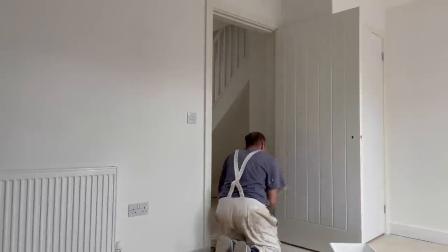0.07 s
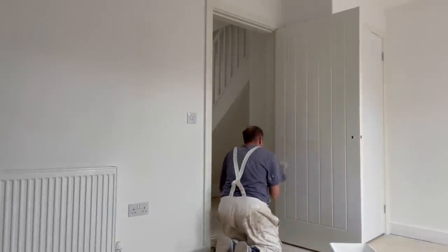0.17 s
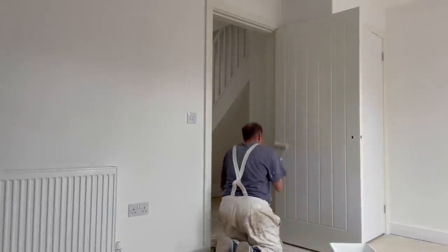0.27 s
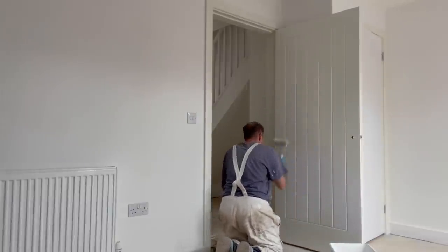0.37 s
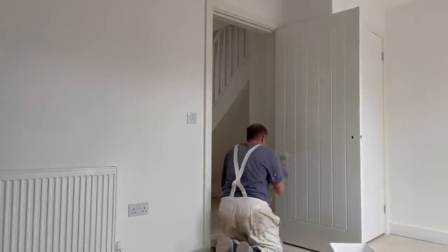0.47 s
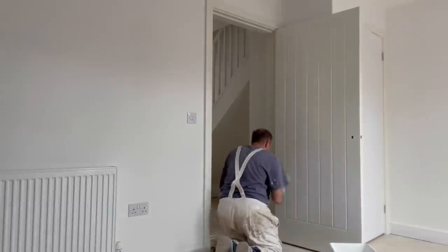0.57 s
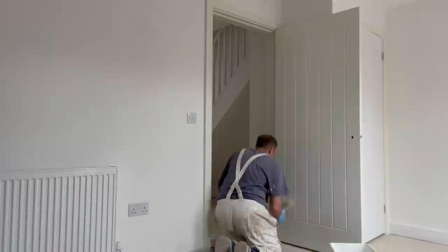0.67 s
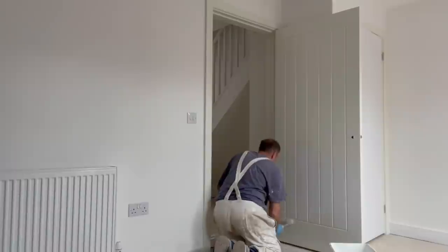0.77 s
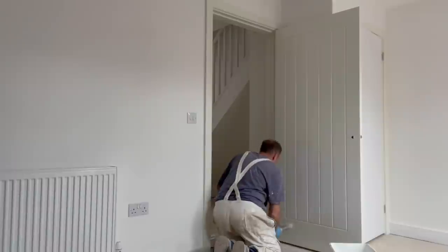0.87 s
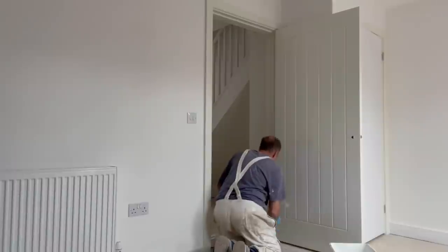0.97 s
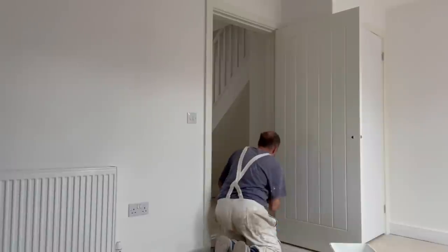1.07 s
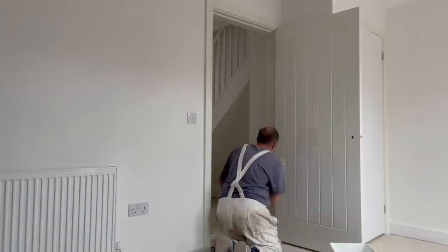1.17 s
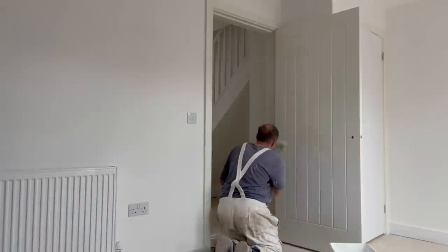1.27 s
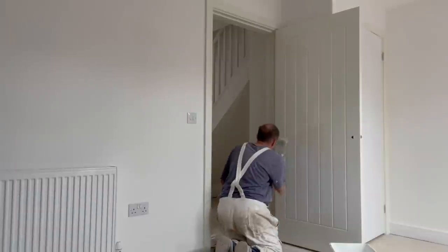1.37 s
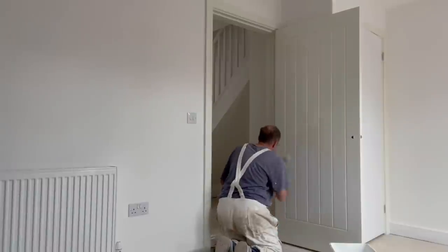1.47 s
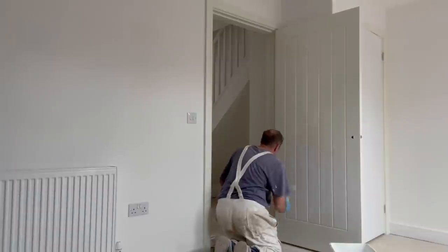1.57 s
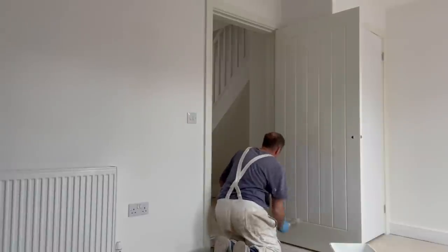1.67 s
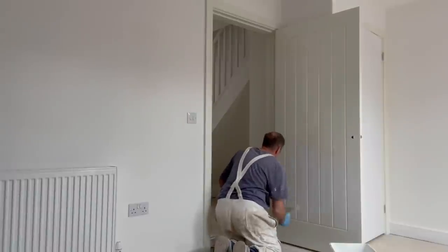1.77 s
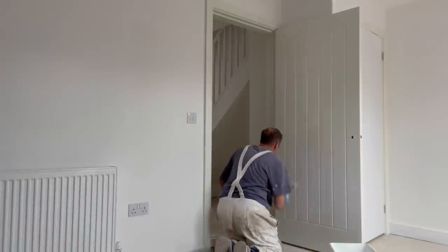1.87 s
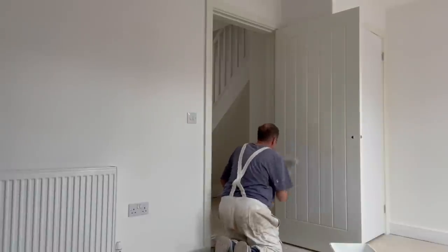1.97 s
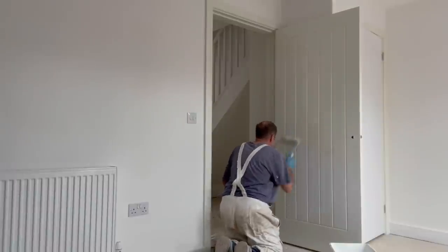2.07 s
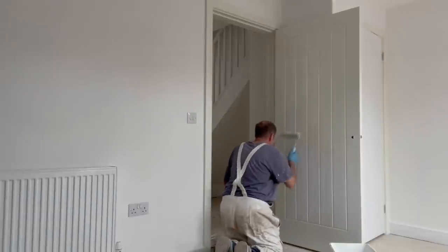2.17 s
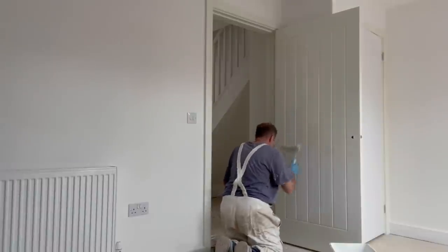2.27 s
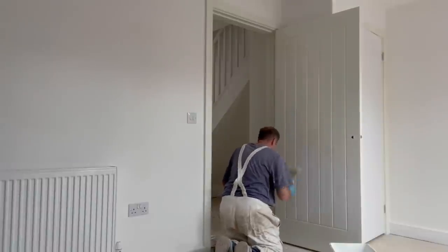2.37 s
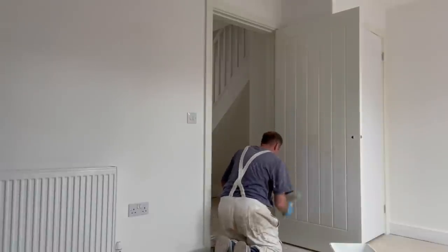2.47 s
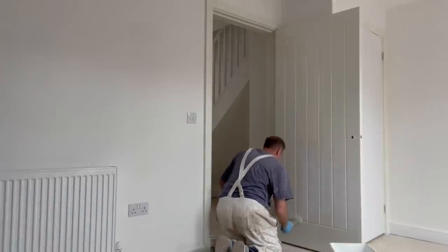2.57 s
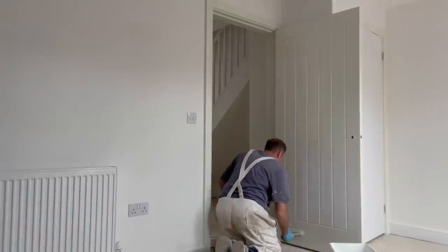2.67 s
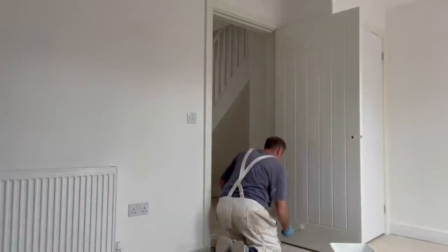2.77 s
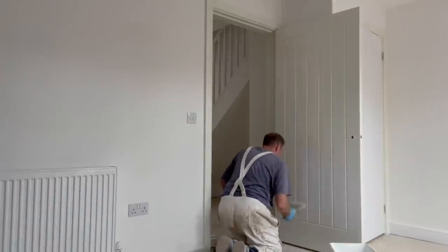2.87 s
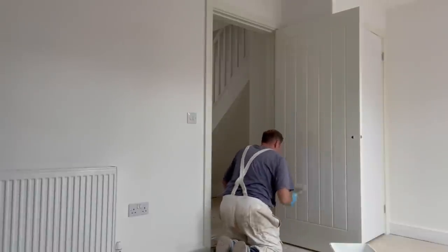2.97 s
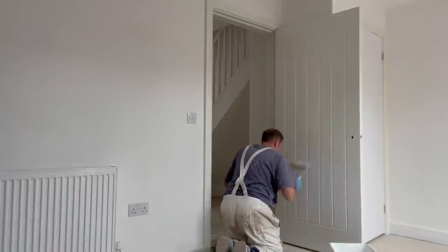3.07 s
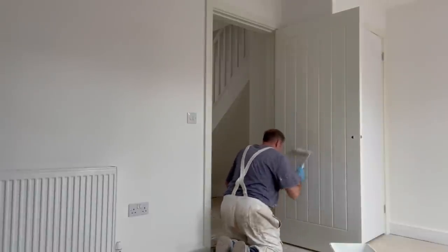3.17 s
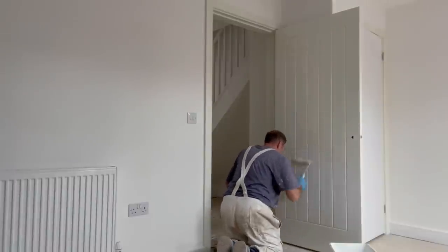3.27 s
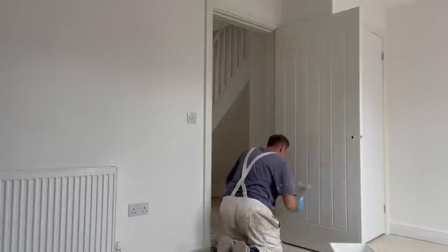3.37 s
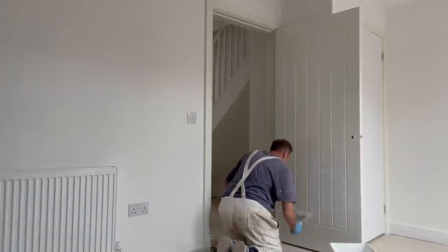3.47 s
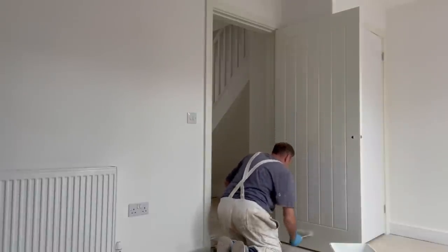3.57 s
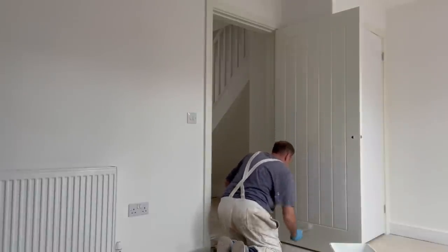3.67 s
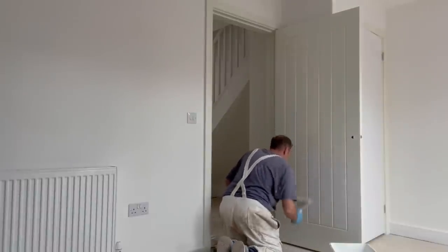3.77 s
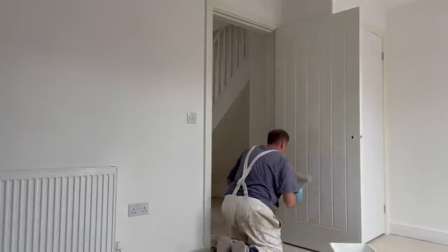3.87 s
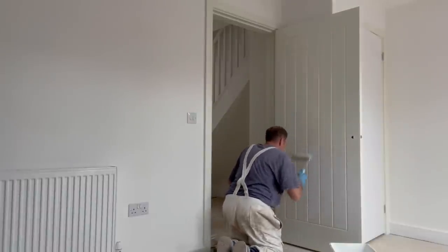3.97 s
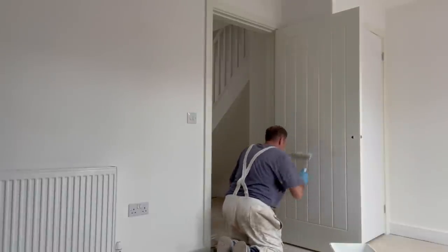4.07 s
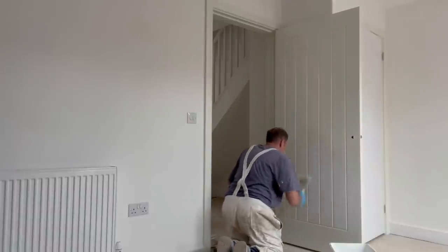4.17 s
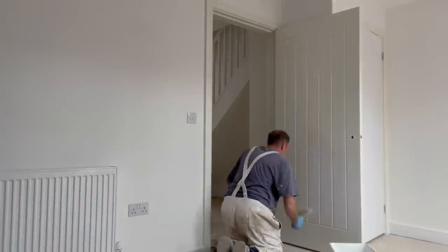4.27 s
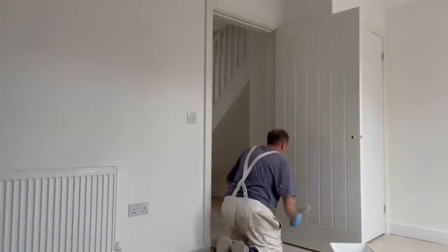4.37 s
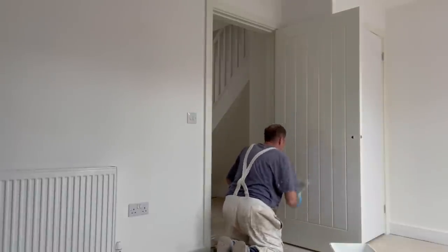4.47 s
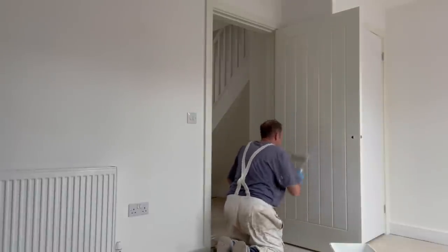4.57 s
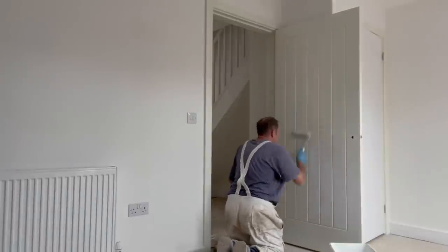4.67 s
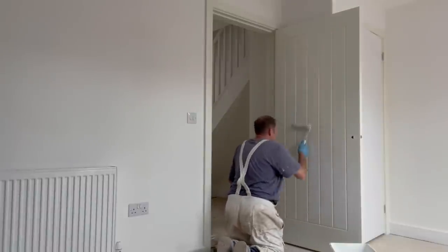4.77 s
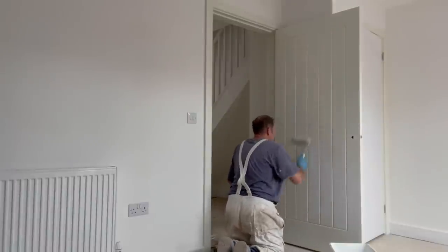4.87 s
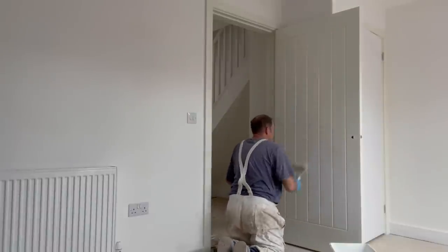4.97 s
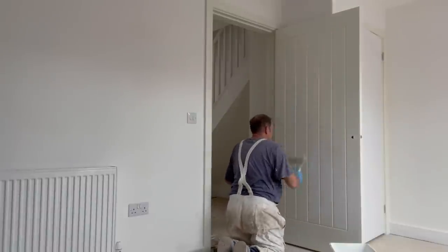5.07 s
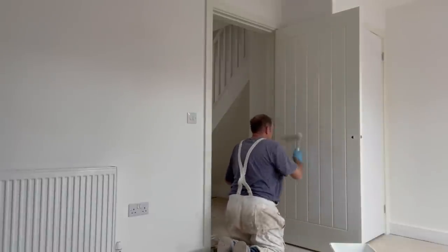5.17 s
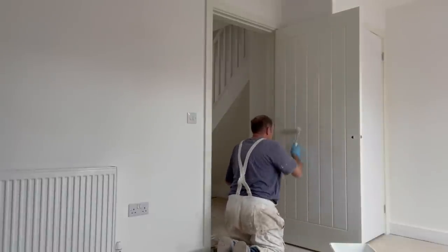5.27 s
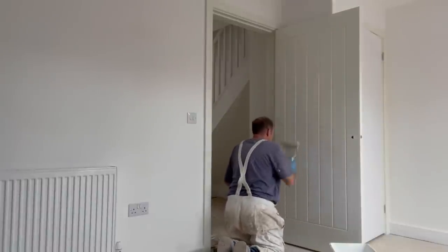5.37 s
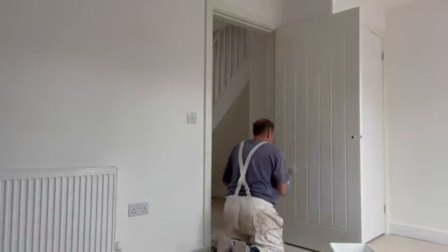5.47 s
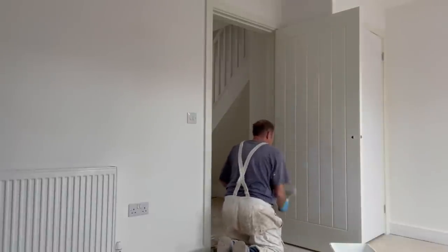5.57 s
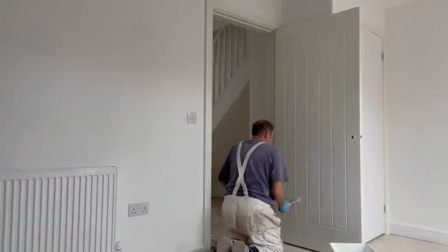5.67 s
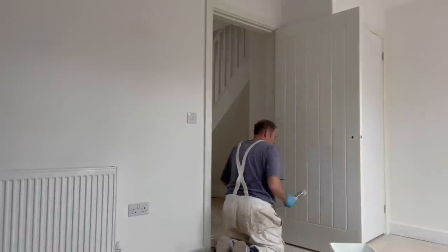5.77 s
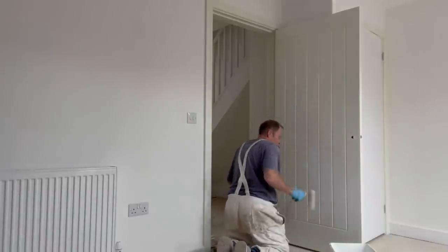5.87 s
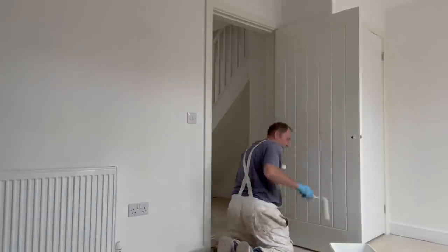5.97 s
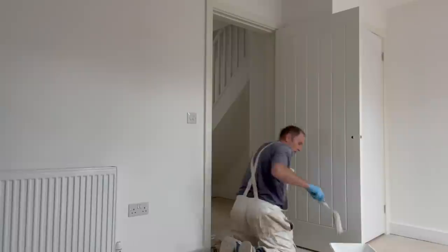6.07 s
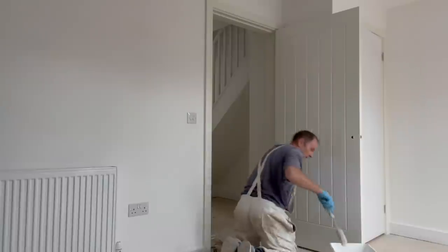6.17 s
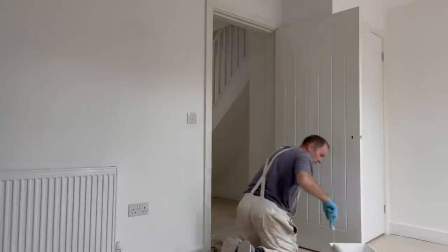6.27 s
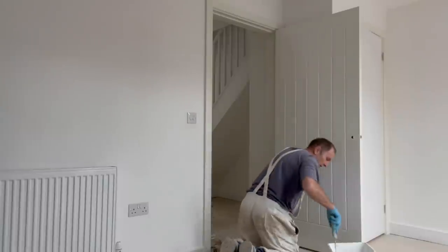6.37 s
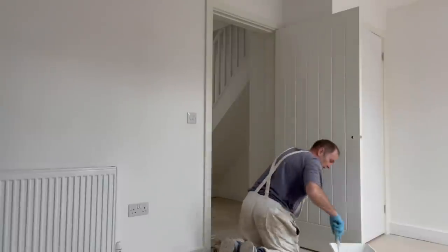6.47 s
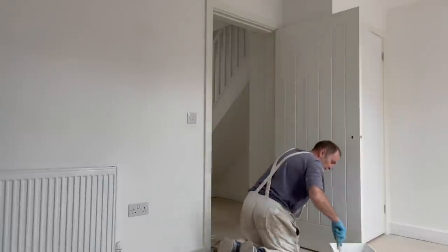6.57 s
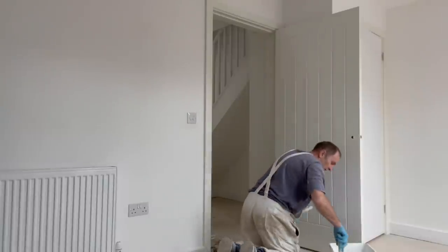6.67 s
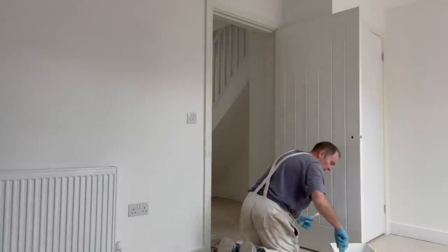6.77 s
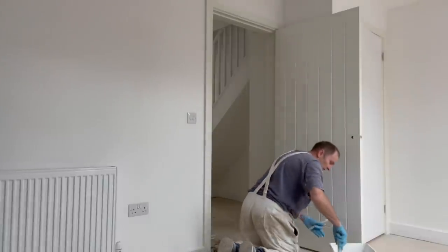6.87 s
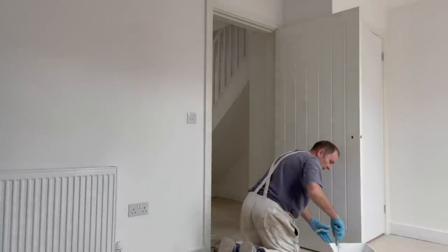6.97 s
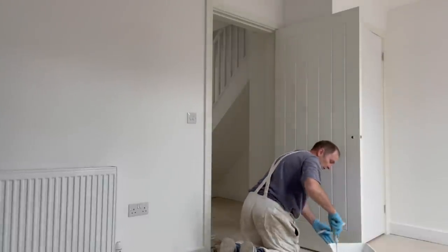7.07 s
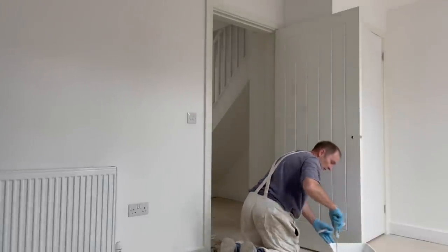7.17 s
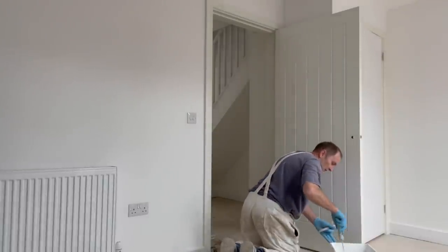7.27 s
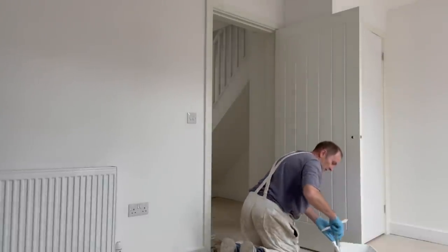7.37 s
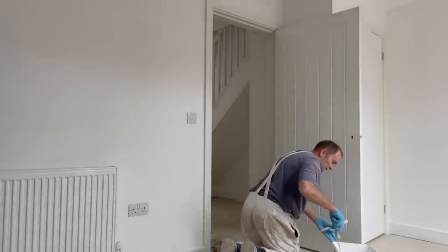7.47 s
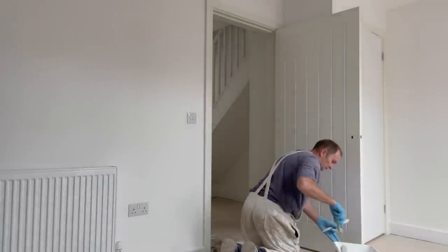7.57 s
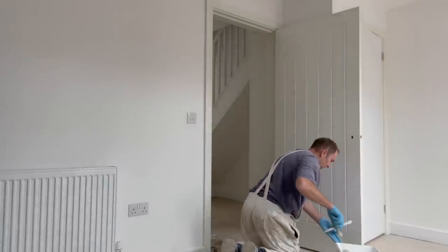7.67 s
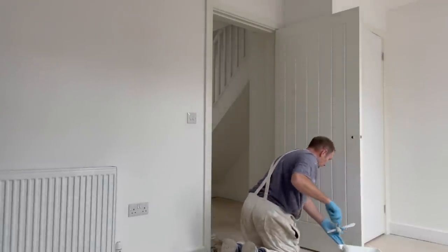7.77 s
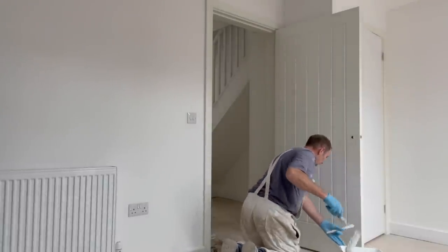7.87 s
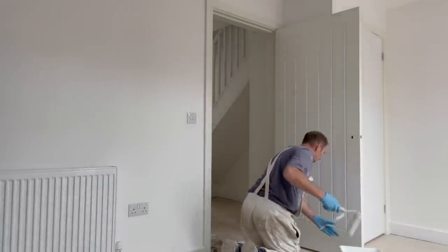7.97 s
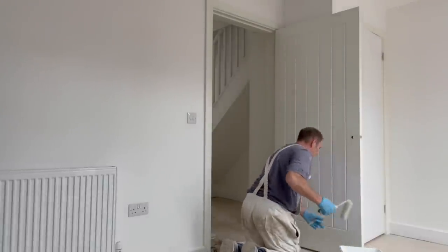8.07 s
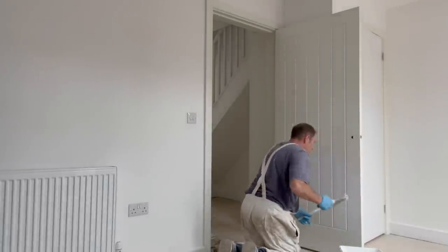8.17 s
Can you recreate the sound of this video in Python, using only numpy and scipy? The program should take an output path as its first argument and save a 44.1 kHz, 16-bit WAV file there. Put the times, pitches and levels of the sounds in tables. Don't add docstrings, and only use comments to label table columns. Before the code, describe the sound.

Indoors, a paint roller rumbles over a wooden door in quick strokes with dull knocks, then a tray is knocked and dragged across the floor.

```python
import sys
import numpy as np
from scipy import signal
from scipy.fft import rfft, irfft, next_fast_len
from scipy.io import wavfile
from scipy.ndimage import uniform_filter1d

SR = 44100
rng = np.random.default_rng(int(sys.argv[2]) if len(sys.argv) > 2 else 0)


def digitize_waveform(pressure):
    field = np.atleast_2d(pressure).T
    bounded = np.clip(field, -1, 1)
    quanta = np.round(bounded * 32767).astype(np.int16)
    wavfile.write(sys.argv[1], SR, quanta)


def invert_db(x):
    u = np.asarray(x, float) / 20
    return 10 ** u


N = 362943

PORT_LAG_S = 20 / SR


def unit(x):
    return x / np.sqrt(np.mean(x ** 2) + 1e-20)


def along(points, hz):
    f, value = np.transpose(points)
    return np.interp(np.log(hz + 1), np.log(f + 1), value)


def curves(rows):
    s, *columns = np.transpose(rows)
    return [np.interp(np.arange(N) / SR, s, column) for column in columns]


def wobble(rate):
    knots = rng.standard_normal(int(N * rate / SR) + 4)
    return np.interp(np.arange(N) * rate / SR, np.arange(len(knots)), knots)


def filtered(x, response):
    m = next_fast_len(N + 8192)
    return irfft(rfft(x, m) * response(np.fft.rfftfreq(m, 1 / SR)), m)[..., :N]


def modes(table):
    def response(f):
        total = 0
        for k, (centre, width, db) in enumerate(table):
            resonance = 1j * f * width / (centre * centre - f * f + 1j * f * width)
            total = total + (-1) ** k * invert_db(db) * resonance
        return total
    return response


def shape(spectrum):
    return lambda hz: invert_db(along(spectrum, hz))


# (frequency [Hz], likeness [0-1])
LIKENESS = [(60, 0.97), (200, 0.79), (350, 0.25), (550, 0.51), (900, 0.37), (1500, 0.016), (6000, 0.068)]


def ports(pair, response):
    m = next_fast_len(N + 8192)
    hz = np.fft.rfftfreq(m, 1 / SR)
    turn = np.arccos(np.clip(along(LIKENESS, hz), -1, 1)) / 2
    common, apart = rfft(pair, m) * response(hz) * [np.cos(turn), np.sin(turn)]
    left = (common + apart) * np.exp(-2j * np.pi * hz * PORT_LAG_S)
    right = common - apart
    return unit(irfft([left, right], m)[:, :N])


def diffuse(response, lumps_db, rate, spiky_db=0):
    noise = rng.standard_normal((2, N))
    force_db = lumps_db * wobble(rate) + spiky_db * rng.standard_normal(N)
    return ports(noise * invert_db(force_db), response)


def gliding(hz, width_hz):
    turn = 2 * np.pi * np.cumsum(hz) / SR
    pair = [wobble(width_hz) * np.cos(turn) + wobble(width_hz) * np.sin(turn) for _ in range(2)]
    return ports(np.array(pair), lambda f: 1)


def swells(rows, pointed, rest_db=-120, order=2):
    t = np.arange(0, N + 64, 64) / SR
    s, rise, hold, fall, db = np.transpose(rows)[:, :, None]
    before, after = (s - t) / abs(rise), (t - s - abs(hold)) / abs(fall)
    away = np.maximum(before, after).clip(0)
    power = (invert_db(db - 10 * away ** pointed) ** order).sum(0) + invert_db(rest_db) ** order + 1e-60
    return np.interp(np.arange(N) / SR, t, 20 / order * np.log10(power))


def thumps(rows, rise, gain_db, overtone):
    out, t = np.zeros(N + SR), np.arange(SR // 6) / SR
    for s, db, hz, t60 in rows:
        phase = rng.uniform(0, 2 * np.pi)
        ring = np.sin(2 * np.pi * hz * t) + overtone * np.sin(2 * np.pi * 1.75 * hz * t + phase)
        contact = 1 - np.exp(-(t / rise) ** 2)
        start = round((s - rise / 3) * SR)
        out[start:][:len(t)] += invert_db(db + gain_db - 60 * t / t60) * contact * ring
    return out[:N]


# (frequency [Hz], t60 [s])
WALLS = [(150, 0.39), (600, 0.73), (4000, 1), (12000, 0.079)]


def room(x, wet_db):
    hz, t, z = signal.stft(rng.standard_normal((2, SR // 2)), SR, nperseg=256)
    decay = invert_db(-60 * t / along(WALLS, hz)[:, None])
    tail = signal.istft(z * decay, SR, nperseg=256)[1]
    tail = tail / np.linalg.norm(tail[0])
    late = np.pad(x, (250, 0))[None]
    wet = signal.fftconvolve(late, tail, axes=1)[:, :N]
    direct = filtered(x, lambda hz: np.exp(-2j * np.pi * hz * [[PORT_LAG_S], [0]]))
    return direct + invert_db(wet_db) * wet


# (frequency [Hz], density [dB per Hz])
AIR = [(20, -40), (28, -19), (48, 4), (76, 0.5), (184, -8.5), (350, -4), (1000, -9), (1600, -12.5),
       (6000, -26.5), (16000, -59)]


def house_air():
    return invert_db(-53.5) * diffuse(shape(AIR), lumps_db=-2.0, rate=4.06)


# (full weight from [s], rise [s], hold [s], fall [s], boom [dB])
ARM_WEIGHT = [(.12, 0.18, 0.092, 0.13, -31.5), (.52, 0.073, 0.1, 0.054, -25.5),
              (.66, 0.033, 0.067, 0.087, -28), (.95, .06, 0.22, 0.19, -31),
              (1.5, 0.075, 0.11, 0.075, -21.5), (1.76, 0.18, 0.26, 0.11, -24.5),
              (2.33, 0.091, 0.14, .05, -23), (2.5, 0.066, 0.049, 0.11, -21),
              (2.82, 0.058, 0.041, 0.041, -28), (2.97, 0.066, 0.15, 0.073, -26.5),
              (3.34, 0.095, 0.17, 0.086, -21), (3.645, 0.014, 0.07, 0.045, -25.5),
              (3.76, 0.044, 0.16, 0.12, -25), (4.13, 0.055, 0.078, 0.11, -21.5),
              (4.42, 0.11, 0.18, 0.12, -24), (4.87, 0.075, 0.061, 0.093, -24.5),
              (5.05, 0.054, 0.039, 0.12, -24.5), (5.36, 0.056, 0.16, 0.096, -26.5)]
# (full speed from [s], rise [s], hold [s], fall [s], paint fizz [dB])
STROKES = [(.05, 0.36, 0.2, 0.1, -48), (.5, 0.17, 0.24, 0.14, -45), (.94, 0.049, 0.27, 0.12, -47),
           (1.5, 0.16, 0.077, 0.13, -43.5), (1.745, 0.048, 0.28, 0.16, -47.5),
           (2.33, 0.17, 0.18, 0.18, -44), (2.77, 0.032, 0.023, 0.21, -48), (2.97, 0.42, 0.065, 0.14, -51),
           (3.4, 0.21, 0.095, 0.11, -46.5), (3.73, 0.13, 0.18, 0.15, -46.5),
           (4.14, 0.11, 0.073, 0.13, -44.5), (4.37, 0.02, 0.18, 0.26, -45.5),
           (4.87, 0.088, 0.044, .13, -44), (5.07, 0.21, 0.025, 0.15, -46), (5.42, 0.13, 0.084, 0.1, -44)]
# (from [s], rise [s], hold [s], fall [s], level [dB])
SWINGS = [(.08, 0.13, 0.48, 0.19, -37.5), (.74, 0.03, 0.066, 0.037, -30.5), (1.1, 0.19, 0.16, 0.095, -37),
          (1.5, 0.27, 0.041, 0.12, -40), (1.76, 0.075, 0.21, 0.1, -31), (2.3, 0.18, 0.084, .1, -45),
          (2.56, 0.019, 0.014, 0.049, -28), (2.78, 0.06, 0.07, 0.44, -36.5),
          (3.48, 0.044, 0.016, 0.053, -23), (3.3, 0.092, 0.073, 0.09, -37),
          (3.68, 0.065, 0.041, 0.22, -30.5), (4.1, 0.081, 0.19, 0.094, -41.5),
          (4.42, 0.064, 0.12, 0.12, -33.5), (4.87, 0.061, 0.14, 0.13, -37), (5.35, 0.12, 0.18, 0.16, -44)]
# (time [s], ring [Hz])
PANEL_RING = [(0, 184.4), (.38, 178), (.7, 263.8), (.92, 245), (1.28, 182.8), (1.62, 273.1), (2.03, 185.5),
              (2.55, 262.8), (2.8, 280), (3.1, 226), (3.48, 269.8), (3.95, 190), (4.25, 269.4),
              (4.7, 224.9), (4.9, 250.6), (5.12, 222.6), (5.33, 225), (5.6, 262.5)]
# (frequency [Hz], width [Hz], level [dB])
DOOR_MODES = [(183, 15.5, 0), (252, 65.3, -2), (300, 48.7, -1), (360, 29, -8), (437.6, 10.1, -4),
              (524, 28, -12), (597, 62, -13.5), (960, 550, -28)]
# (frequency [Hz], width [Hz], level [dB])
HINGE_MODES = [(50, 7.2, -4.5), (75.4, 11.3, 2), (99, 25.7, 6), (143, 38, -2.5)]
# (frequency [Hz], density [dB per Hz])
FIZZ = [(2000, -3), (3500, -2), (5000, 0), (7000, 0), (10000, -1), (13000, -4), (16000, -6)]
# (frequency [Hz], density [dB per Hz])
RUB = [(410, 4), (700, 2.5), (798, 2), (1040, -2.5), (1470, -20.5), (2210, -8), (5000, -16.5), (6500, -46),
       (11000, -120)]


def roller():
    lift_s = 5.62
    on_door = np.clip((lift_s - np.arange(N) / SR) / 0.094 + 1, 1e-4, 1)
    boom_db = swells(ARM_WEIGHT, pointed=1.33, rest_db=-57, order=4)
    fizz_db = swells(STROKES, pointed=1.29, rest_db=-55.5, order=8)
    rub_db = -48.5 + 0.56 * (fizz_db + 47) + 0.37 * (boom_db + 27.0)
    panel_hz, = curves(PANEL_RING)
    boom = invert_db(boom_db - 5.0) * diffuse(modes(DOOR_MODES), lumps_db=0.6, rate=51)
    panel = invert_db(boom_db - 8.5) * gliding(panel_hz, width_hz=54)
    sway = invert_db(swells(SWINGS, pointed=0.97)) * diffuse(modes(HINGE_MODES), lumps_db=0.0, rate=31)
    fizz = invert_db(fizz_db + 6.0) * diffuse(shape(FIZZ), lumps_db=-0.33, rate=14, spiky_db=2.5)
    sheen_gain = invert_db(0.27 * (fizz_db + 45.5)) - 1
    fizz = fizz + sheen_gain * filtered(fizz, lambda hz: hz > 10900)
    rub = invert_db(rub_db + 7) * diffuse(shape(RUB), lumps_db=0.6, rate=36, spiky_db=-1.0)
    return on_door * (boom + panel + sway + fizz + rub)


# (from [s], hold [s], level [dB], ring [Hz], split into two bands [Hz])
SHUFFLE = [
    (0.01, 0.065, -51, 2050, 460),
    (1.57, 0.12, -53, 1659, 25),
    (5.71, 0.18, -48, 1230, 200),
    (5.944, 0.06, -46, 859, 219.7),
    (6.14, 0.068, -51.5, 1860, 439),
]


def cloth():
    rise_s, fall_s, sag_hz_per_s = 0.032, 0.16, 350
    s, hold, db, ring, split = np.transpose(SHUFFLE)
    level_db = swells([(a, rise_s, h, fall_s, d) for a, h, d in zip(s, hold, db)], pointed=1.3)
    t = np.arange(N) / SR
    slide = np.searchsorted(s[1:] - rise_s, t)
    ring_hz = (ring[slide] - sag_hz_per_s * (t - s[slide])).clip(400)
    two_bands = np.cos(2 * np.pi * np.cumsum(split[slide]) / SR)
    return invert_db(level_db + 6.5) * gliding(ring_hz, width_hz=400) * two_bands


# (from [s], rise [s], hold [s], fall [s], level [dB])
DRAGS = [
    (0.01, 0.03, 0.041, 0.16, -46.5),
    (5.77, 0.086, 0.056, 0.28, -43.5),
    (6.18, 0.04, 0.046, 0.039, -44.5),
    (6.235, 0.017, 0.045, 0.14, -42),
    (6.375, .006, 0.033, 0.13, -46.5),
    (6.54, 0.052, 0.014, 0.14, -44),
    (7.04, 0.045, 0.019, 0.1, -54),
    (7.285, 0.01, 0.084, 0.11, -50.5),
    (7.9, 0.21, 0.063, 0.17, -41),
]
# (from [s], rise [s], hold [s], fall [s], level [dB])
HOLLOW_SWELLS = [(5.6, 0.074, 0.011, 0.087, -40), (5.79, 0.05, 0.029, 0.134, -45),
                 (5.97, 0.059, 0.054, 0.057, -50), (6.24, 0.01, 0.032, 0.043, -31.5),
                 (6.36, .05, 0.039, 0.13, -45.5), (6.54, 0.061, 0.071, 0.15, -46.5),
                 (7.04, 0.026, .02, 0.11, -55), (7.295, 0.011, 0.053, 0.068, -37),
                 (7.42, 0.064, 0.12, .1, -43), (7.56, 0.023, 0.023, 0.043, -34),
                 (7.64, 0.04, 0.085, 0.036, -27), (7.78, 0.017, 0.038, 0.029, -31),
                 (7.9, .1, 0.17, 0.095, -43.5)]
# (from [s], rise [s], hold [s], fall [s], level [dB])
DIPS = [(5.77, 0.23, 0.011, 0.13, -55.5), (6.01, 0.067, .03, .09, -55.5), (6.23, 0.0085, .01, 0.16, -48),
        (6.372, .008, 0.034, 0.099, -62), (6.53, 0.038, 0.029, 0.065, -49),
        (6.595, 0.033, 0.017, 0.072, -46.5), (6.8, .08, 0.27, 0.074, -64), (7.0, 0.018, 0.11, 0.079, -56.5),
        (7.284, 0.0009, 0.072, 0.15, -48), (7.67, 0.064, 0.12, 0.078, -44.5),
        (7.92, .1, 0.12, 0.049, -60.5)]
# (from [s], rise [s], hold [s], fall [s], level [dB])
THUDS = [
    (5.74, 0.057, 0.043, 0.022, -50.5),
    (7.37, .03, 0.042, .06, -41),
    (6.0, 0.057, 0.017, 0.057, -45),
    (6.25, 0.022, 0.036, 0.1, -33.5),
    (6.6, 0.023, 0.0092, 0.041, -47.5),
    (7.0, .03, 0.026, 0.15, -55.5),
    (7.31, 0.0069, 0.036, 0.076, -32),
    (7.6, 0.12, 0.16, 0.14, -36),
    (7.95, 0.08, 0.1, 0.12, -52.5),
]
# (frequency [Hz], width [Hz], level [dB])
HOLLOW_MODES = [(218, 46, -2), (280, 102, 1.5), (368, 49, 5), (430, 46, -7.5), (560, 210, -6.5)]
# (frequency [Hz], density [dB per Hz])
SLOSH = [(2000, -8), (3500, -1.5), (5000, -1), (7000, -3), (10000, -4), (13000, -10), (16000, -14)]
# (frequency [Hz], density [dB per Hz])
SCRAPE = [(260, -38), (450, 0.5), (579, -1), (638, 2.5), (842, 1), (905, 4.5), (1010, 1.5), (1380, -1),
          (2180, -5.5), (2520, -6), (5310, -17.5), (8000, -25), (10400, -49), (17600, -120)]


def tray():
    floor_modes = [(71.4, 54, -1.5), (155, 64, 2)]  # (Hz, width Hz, dB)
    hollow_db = swells(HOLLOW_SWELLS, pointed=0.87)
    hollow = invert_db(hollow_db + 3.0) * diffuse(modes(HOLLOW_MODES), lumps_db=3.5, rate=35)
    thud_db = swells(THUDS, pointed=0.99)
    thud = invert_db(thud_db + 0.3) * diffuse(modes(floor_modes), lumps_db=0.0, rate=9.6)
    dip_db = swells(DIPS, pointed=0.8)
    fizz = invert_db(dip_db + 5.5) * diffuse(shape(SLOSH), lumps_db=1.5, rate=38, spiky_db=4.0)
    drag_db = swells(DRAGS, pointed=1.35)
    scrape = invert_db(drag_db + 4.0) * diffuse(shape(SCRAPE), lumps_db=-0.15, rate=74, spiky_db=1.0)
    return hollow + thud + fizz + scrape


# (time [s], peak [dB], ring [Hz], t60 [s])
TAPS = [(.012, -36, 602, 0.18), (.05, -38, 570, .15), (.15, -25, 190, .08), (.212, -27, 158, .15),
        (1.075, -26.5, 135, 0.21), (1.485, -25, 564, .06), (1.578, -23, 554, 0.073),
        (2.758, -15, 502, 0.063), (2.776, -12, 430, 0.078), (2.786, -16, 380, 0.059),
        (2.811, -25, 529.6, 0.065), (2.829, -22, 565, 0.055), (2.85, -28, 580, .06),
        (2.868, -24, 473, 0.048), (2.884, -30, 600, .04), (2.915, -34, 510.4, 0.064),
        (3.338, -22, 560, 0.046), (3.459, -12.5, 494, 0.051), (3.474, -19, 635, 0.074),
        (3.488, -18, 418, 0.051), (3.524, -32, 490, 0.05), (5.61, -29.5, 278.6, 0.13),
        (5.779, -36, 357, .1), (5.884, -37, 415, 0.1), (5.945, -31, 750, .06), (5.985, -36, 109, .1),
        (6.033, -33, 730, .07), (6.16, -40, 643, 0.23), (6.296, -26, 170, 0.12), (6.325, -33, 200, 0.068),
        (6.35, -34, 322, 0.1)]


def taps():
    return thumps(TAPS, rise=0.0059, gain_db=2.0, overtone=0)


# (time [s], peak [dB], ring [Hz])
NUDGES = [(0.103, -27, 185), (0.263, -30, 170), (0.442, -31, 220), (0.534, -18.5, 280), (0.669, -26, 314),
          (0.778, -42, 282), (0.924, -28.5, 256), (1.056, -26, 259), (1.119, -28, 316), (1.426, -28, 248),
          (1.785, -33, 250), (1.924, -16.5, 251), (2.014, -21.5, 183), (2.292, -29, 208), (2.327, -31, 272),
          (2.408, -19, 267), (2.459, -16, 283), (2.539, -16, 269), (2.813, -25, 286), (3.119, -30, 226),
          (3.305, -19, 213), (3.503, -28, 258), (3.909, -22, 279), (4.097, -23, 243), (4.124, -26, 243),
          (4.21, -21, 311.1), (4.215, -20.5, 256), (4.499, -17, 213), (4.519, -14.5, 259),
          (4.564, -22, 225), (4.609, -21, 213), (4.806, -29, 270.9), (4.891, -20, 293), (5.03, -20, 247),
          (5.094, -21, 209.7), (5.131, -21.5, 261), (5.31, -31, 203), (5.499, -28, 260), (5.593, -31, 268)]
# (time [s], peak [dB], ring [Hz])
BOARDS = [(0.587, -28.5, 526), (0.686, -28, 486), (0.725, -22.5, 347), (0.791, -30.5, 444),
          (1.542, -26, 380), (1.574, -32, 426), (1.596, -36, 328), (2.429, -24, 454), (2.555, -19, 356),
          (2.619, -29, 344), (2.838, -17, 339), (2.869, -30, 344), (3.32, -22, 437), (3.359, -21, 427),
          (3.476, -15, 373), (3.536, -16, 350), (3.823, -20.5, 430), (3.945, -35, 542), (4.149, -24, 383),
          (4.194, -20, 434), (4.229, -30, 377), (4.299, -31, 443), (4.368, -27, 436), (4.441, -29, 382),
          (4.477, -25, 424), (4.518, -25.5, 380), (5.08, -23.5, 362), (5.201, -37, 423), (5.542, -33, 443)]
# (time [s], peak [dB], ring [Hz])
BUMPS = [(0.609, -13.5, 265), (1.49, -8.5, 228), (1.533, -6, 255), (1.587, -7, 283.4), (1.653, -16, 293),
         (1.734, -26, 252), (1.895, -10.5, 243), (2.519, -9.5, 300), (3.402, -12.5, 274),
         (2.958, -16.5, 250), (3.017, -14, 229.9), (3.051, -16, 225), (3.438, -9, 248),
         (3.337, -8.5, 243.2), (3.384, -7, 252), (3.654, -12.5, 284.5), (3.736, -12.5, 194),
         (3.821, -15, 263.3), (3.858, -10.5, 270), (4.17, -16, 269), (4.355, -15.5, 252),
         (4.42, -11.5, 268.5), (4.479, -11.5, 223), (4.848, -15.5, 218), (5.07, -19, 192),
         (5.394, -14.5, 228.5), (5.454, -11, 260), (5.544, -19, 275)]


def bumps():
    nudge_t60, bump_t60 = 0.076, 0.057
    light = thumps([(*row, nudge_t60) for row in NUDGES], rise=0.0073, gain_db=6.0, overtone=0.16)
    boards = thumps([(*row, nudge_t60) for row in BOARDS], rise=0.00745, gain_db=6.5, overtone=0)
    hard = thumps([(*row, bump_t60) for row in BUMPS], rise=0.011, gain_db=10, overtone=0.2)
    return light + boards + hard


# (time [s], peak [dB])
SMACKS = [(0.923, -53), (1.734, -45), (2.76, -52), (3.338, -33), (3.458, -23.5), (4.359, -46), (5.999, -50),
          (6.229, -23), (6.371, -18.5), (6.394, -20), (6.495, -46), (6.524, -41), (6.599, -39),
          (6.99, -29.5), (7.284, -49), (7.312, -23)]


def smacks():
    out, t = np.zeros(N + SR), np.arange(SR // 5) / SR
    t60 = 0.077
    for s, db in SMACKS:
        out[round(s * SR):][:len(t)] += invert_db(db - 16.0 - 60 * t / t60) * rng.standard_normal(len(t))
    return filtered(out[:N], shape([(500, -37), (2500, 10.0), (7000, -2), (16000, -16)]))


# (time [s], peak [dB], ring [Hz], t60 [s])
KNOCKS = [(2.757, 5, 275, 0.034), (3.458, 4.5, 285, 0.038), (5.94, -18.5, 393, 0.031),
          (5.95, -39, 87, 0.13), (6.233, -13.5, 300, 0.037), (6.243, -21, 184, 0.052),
          (6.242, -23, 620, 0.043), (6.27, -33, 197, 0.049), (6.277, -28, 146, 0.13),
          (6.53, -34, 457, 0.16), (6.59, -24, 430, 0.052), (6.98, -38, 129, 0.075), (7.286, -24, 300, 0.12),
          (7.293, -18, 277, 0.037), (7.309, -3, 275, 0.036), (7.324, -9, 334, 0.066),
          (7.337, -11.5, 200, 0.068), (7.61, -28, 355, 0.11), (7.773, -27, 406, 0.1)]


def knocks():
    return thumps(KNOCKS, rise=0.0069, gain_db=2.5, overtone=0.022)


# (from [s], rise [s], hold [s], fall [s], level [dB])
RATTLES = [
    (6.229, .002, .012, 0.05, -38),
    (6.372, .003, 0.0078, 0.04, -48),
    (6.394, .003, .01, 0.055, -47),
    (6.525, .003, .01, .05, -61),
]
# (frequency [Hz], width [Hz], level [dB])
CAGE_MODES = [(2620, 320, -3), (3360, 550, 1.5), (4200, 170, -3), (6160, 760, 0), (7200, 450, -2.5),
              (8200, 380, -5)]


def cage():
    def wire(hz):
        return modes(CAGE_MODES)(hz) ** 2 + 0.19 * (hz > 2000) * (hz < 9000)
    return invert_db(swells(RATTLES, pointed=0.49)) * diffuse(wire, lumps_db=2.5, rate=90, spiky_db=3)


# (from [s], rise [s], hold [s], fall [s], level [dB])
HAULS = [
    (7.55, 0.046, .02, .05, -35),
    (7.61, 0.061, 0.038, .05, -30.5),
    (7.68, 0.054, 0.077, 0.049, -29.5),
    (7.75, 0.022, 0.037, 0.084, -30),
    (7.82, 0.055, 0.016, 0.063, -34),
]
# (frequency [Hz], density [dB per Hz])
HAUL_RASP = [(260, -40), (520, 1), (600, -2), (760, -11), (1000, -4), (1330, 1.5), (1700, -2), (2150, -5.5),
             (2520, -4.5), (3500, -10.5), (5310, -17.5), (8000, -26.5), (10400, -53), (17600, -120)]
# (frequency [Hz], density [dB per Hz])
GRIT = [(5000, -28), (9000, 0), (13000, -3), (16000, -4)]


def haul():
    haul_db = swells(HAULS, pointed=1.05, order=4)
    rasp = invert_db(haul_db + 3.0) * diffuse(shape(HAUL_RASP), lumps_db=-0.6, rate=82, spiky_db=1.0)
    grit_db = 2.6 * (haul_db + 32.0) - 46.5
    grit = invert_db(grit_db) * diffuse(shape(GRIT), lumps_db=0.5, rate=50, spiky_db=-8)
    return rasp + grit


def scene():
    rubbed = house_air() + roller() + cloth() + tray() + cage() + haul()
    blows = bumps() + smacks() + knocks()
    return rubbed + room(taps(), wet_db=-7) + room(blows, wet_db=-4.5)


def top_cut(x):
    return signal.sosfilt(signal.butter(12, 16520, fs=SR, output="sos"), x)


# (frequency [Hz], depth [dB])
GLINT = [(250, 1.32), (700, 3.5), (6000, 1.5), (14000, 3)]
# (frequency [Hz], level [dB])
BALANCE = [(60, .7), (180, -1), (700, -.6), (1400, 1.2), (2800, 2.6), (5500, .3), (9000, 0)]
# (frequency [Hz], share [0-1])
OWN_SHARE = [(6100, 1), (6200, 0.16), (8500, 0), (9800, 0.19), (15000, 0.01)]
# (frequency [Hz], phase [cycles])
TREBLE_LAG = [(6100, -0.21), (7700, -0.082), (10200, 0.452), (12000, 0.557), (14100, 0.94), (15800, 1.06)]


def record(dry):
    joint_hz, top_hz, low_cut_hz = 6150, 15800, 31
    hz, _, z = signal.stft(dry, SR, nperseg=1024)
    spots = uniform_filter1d(rng.standard_normal(z.shape), size=2, axis=1)
    spots = uniform_filter1d(spots, size=4, axis=2)
    glint_db = along(GLINT, hz)[:, None] * unit(spots) - 1
    z = z * invert_db(glint_db) * (hz < top_hz)[:, None]
    x = signal.istft(z, nperseg=1024)[1][:, :N]

    def microphones(hz):
        return invert_db(along(BALANCE, hz) * [[.5], [-.5]]) / (1 + (low_cut_hz / (hz + 1)) ** 4)

    def joint(hz):
        return (hz >= joint_hz) * np.exp(-2j * np.pi * along(TREBLE_LAG, hz) * [[0], [1]])

    x = filtered(x, microphones)
    own = filtered(x, lambda hz: np.clip(along(OWN_SHARE, hz), 0, 1))
    shared = filtered(x[1], joint)
    return top_cut(own + shared)


dry = scene()
out = record(dry)
digitize_waveform(out)
```